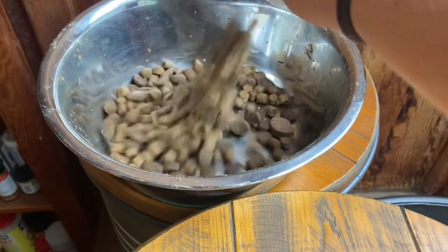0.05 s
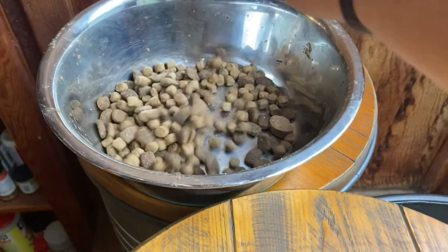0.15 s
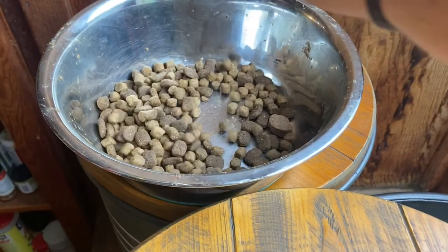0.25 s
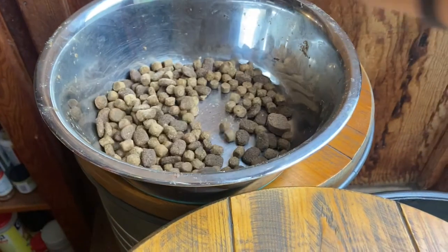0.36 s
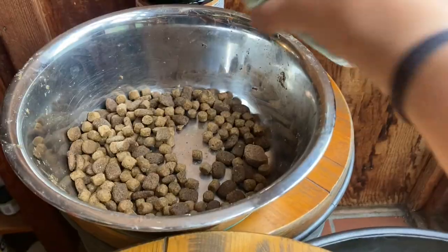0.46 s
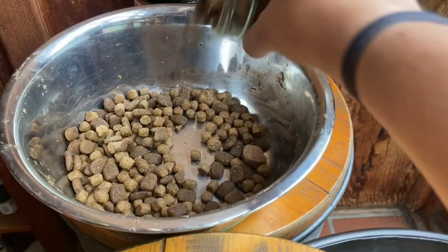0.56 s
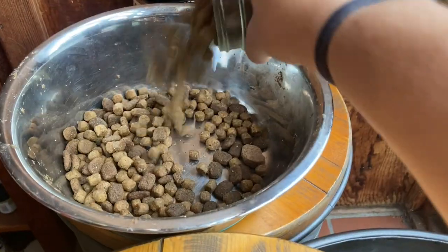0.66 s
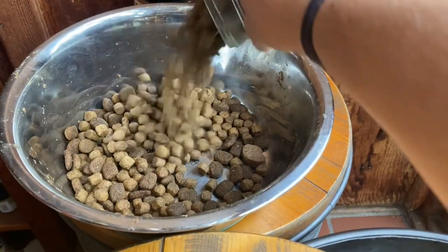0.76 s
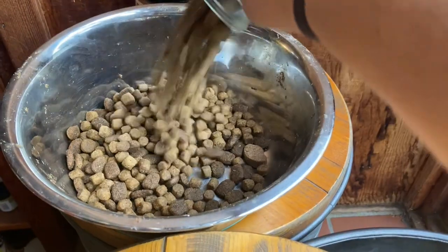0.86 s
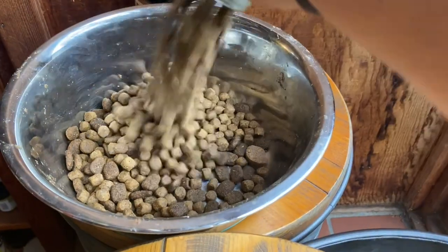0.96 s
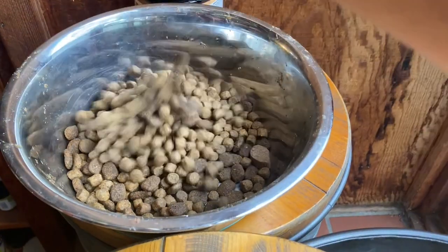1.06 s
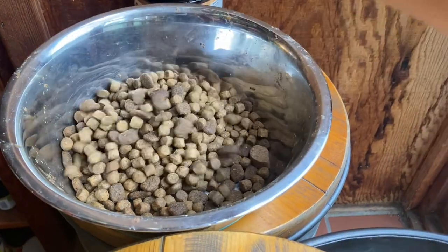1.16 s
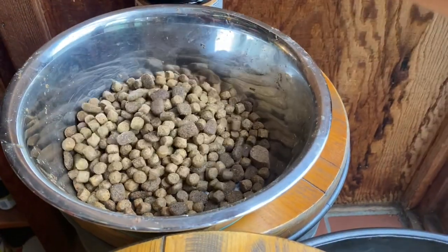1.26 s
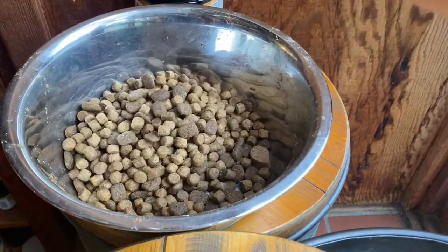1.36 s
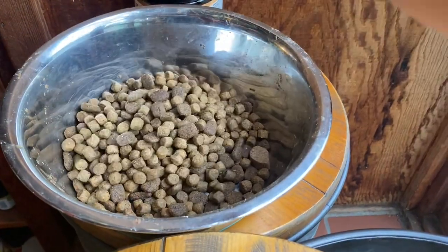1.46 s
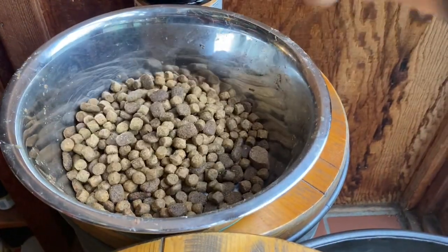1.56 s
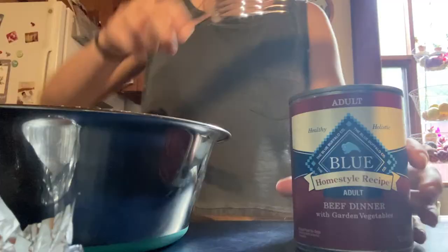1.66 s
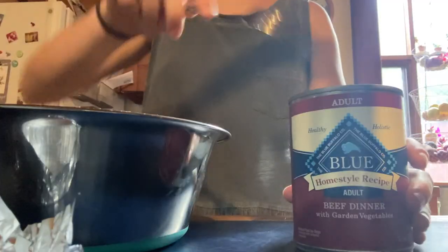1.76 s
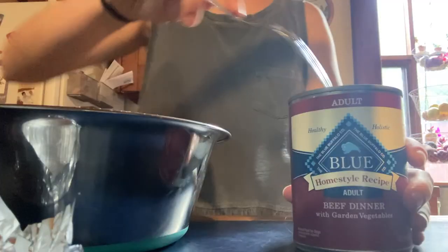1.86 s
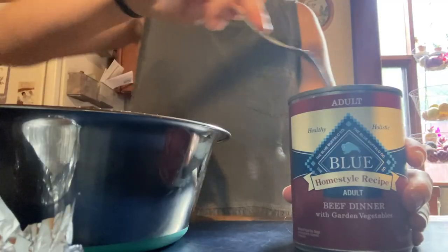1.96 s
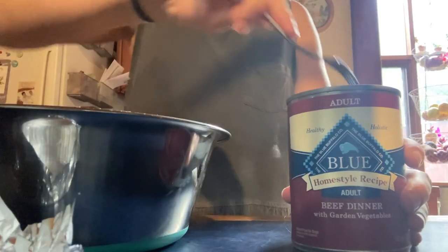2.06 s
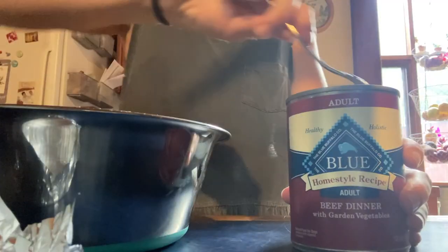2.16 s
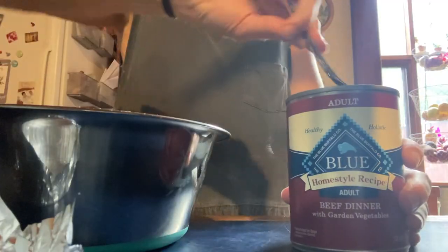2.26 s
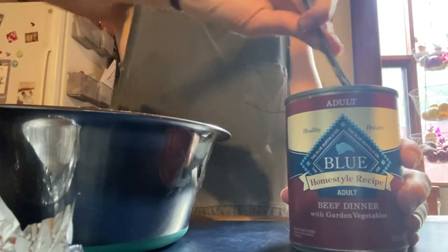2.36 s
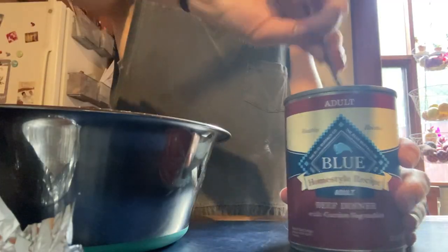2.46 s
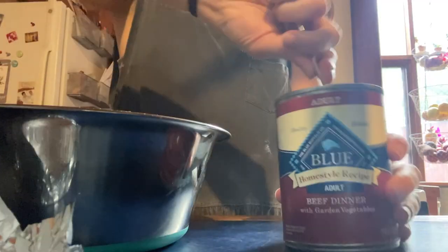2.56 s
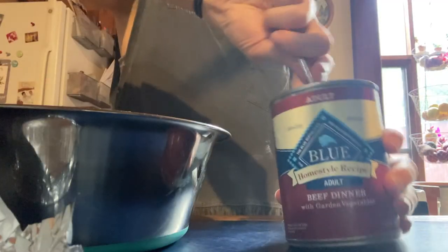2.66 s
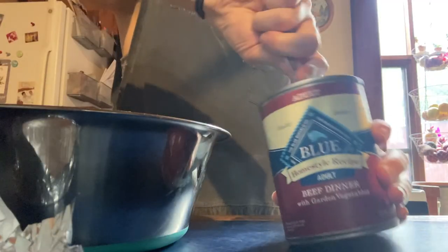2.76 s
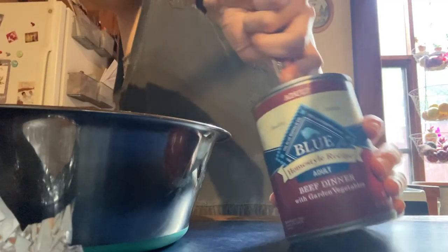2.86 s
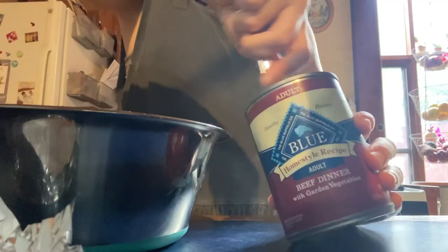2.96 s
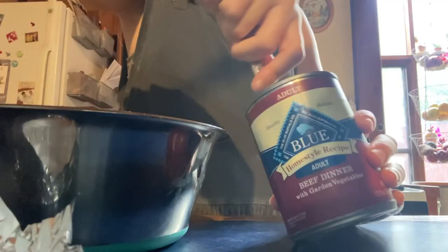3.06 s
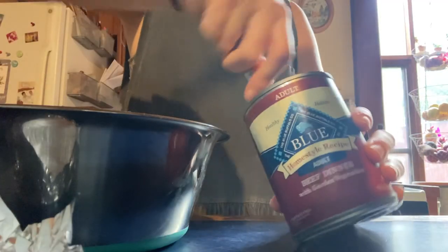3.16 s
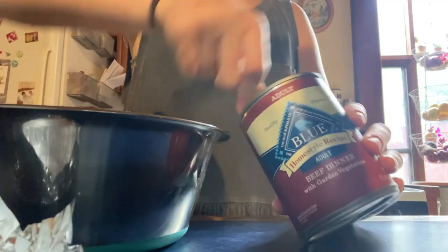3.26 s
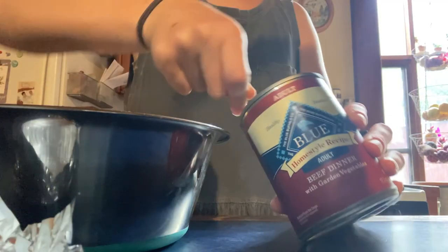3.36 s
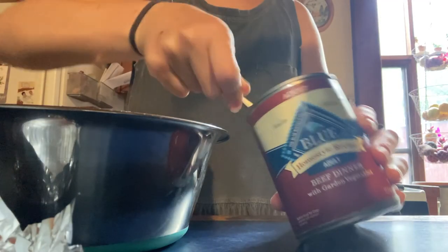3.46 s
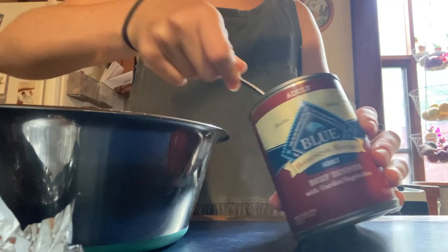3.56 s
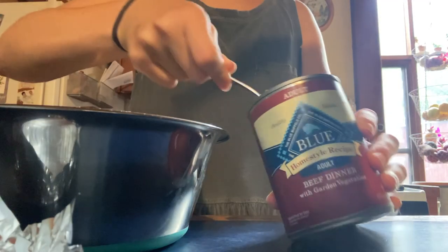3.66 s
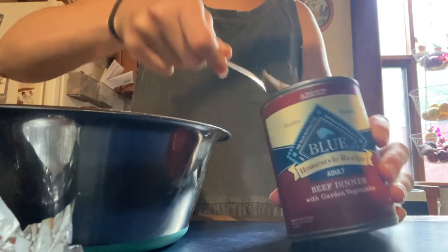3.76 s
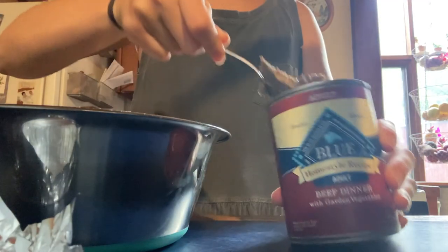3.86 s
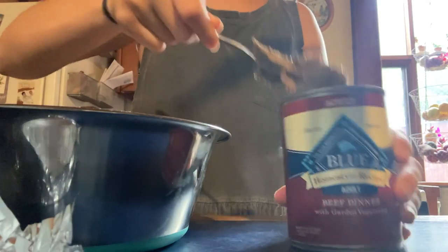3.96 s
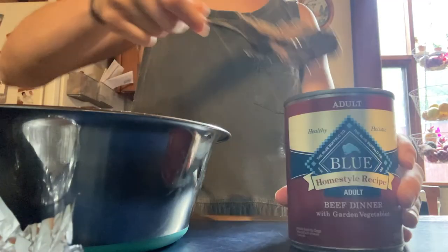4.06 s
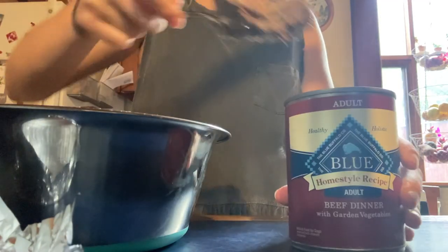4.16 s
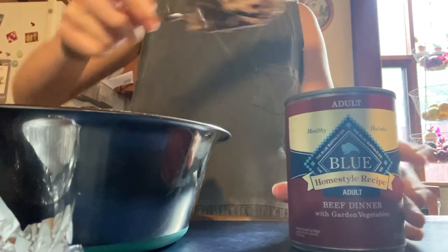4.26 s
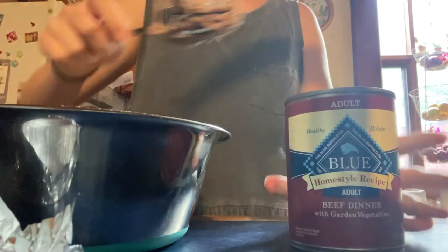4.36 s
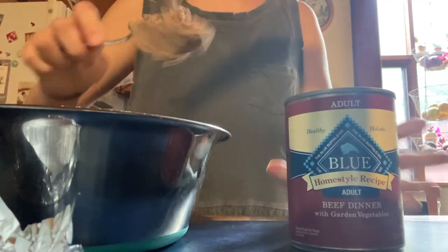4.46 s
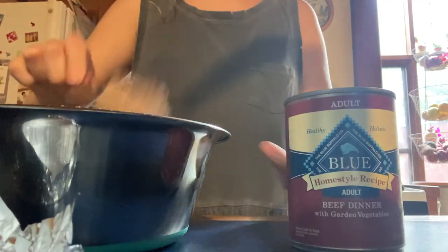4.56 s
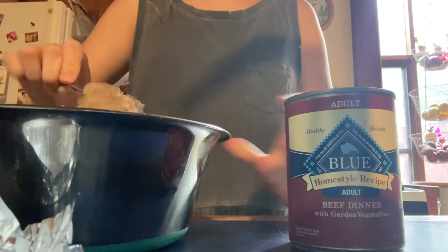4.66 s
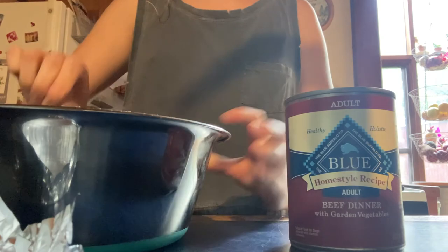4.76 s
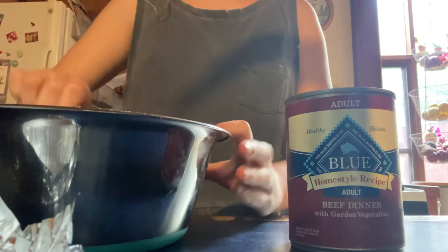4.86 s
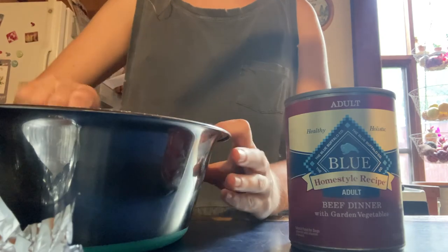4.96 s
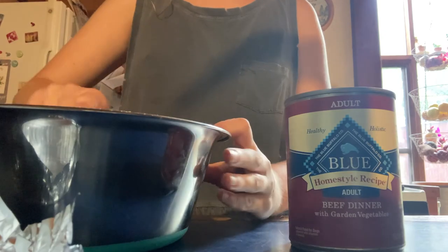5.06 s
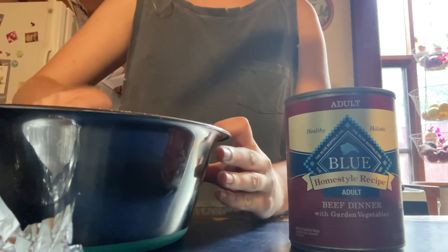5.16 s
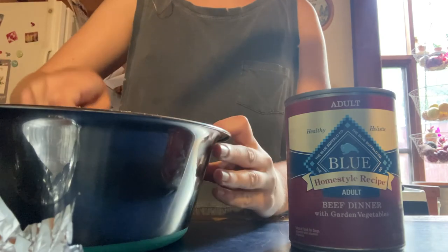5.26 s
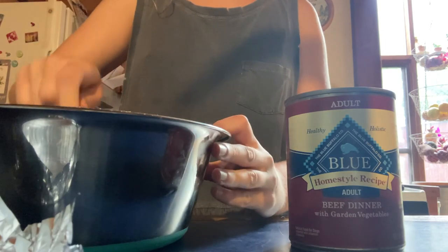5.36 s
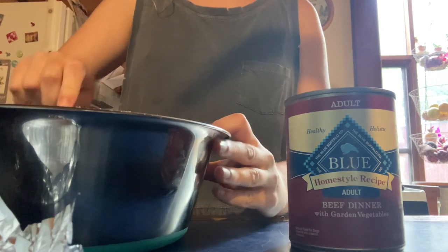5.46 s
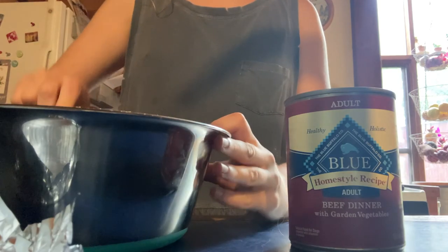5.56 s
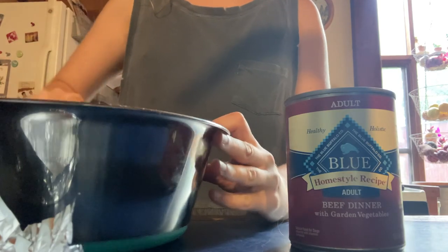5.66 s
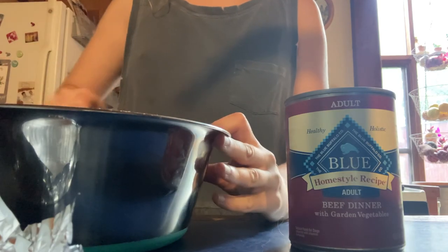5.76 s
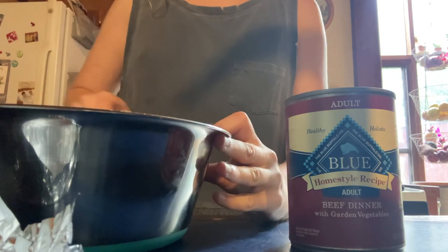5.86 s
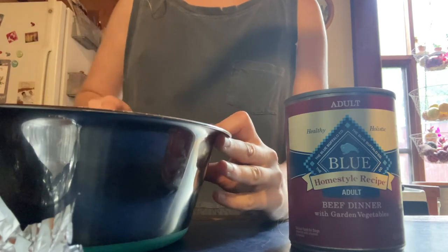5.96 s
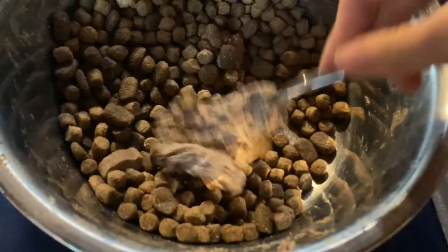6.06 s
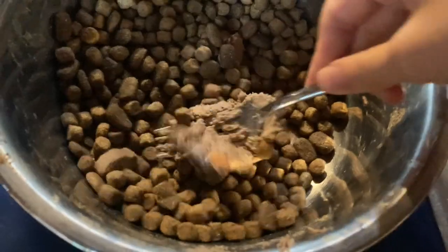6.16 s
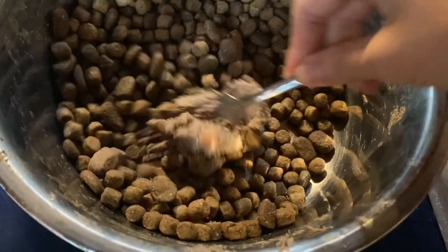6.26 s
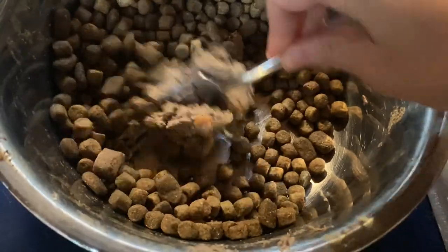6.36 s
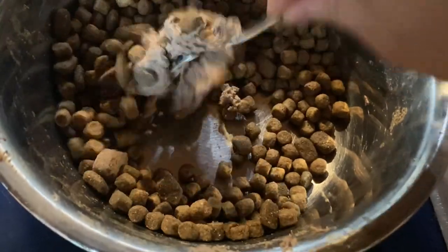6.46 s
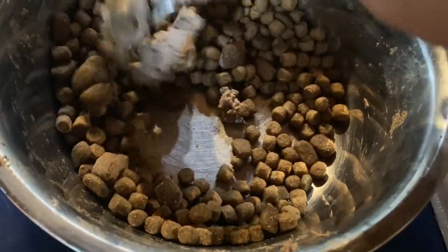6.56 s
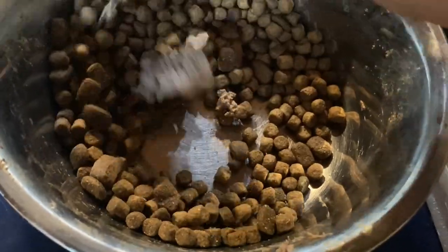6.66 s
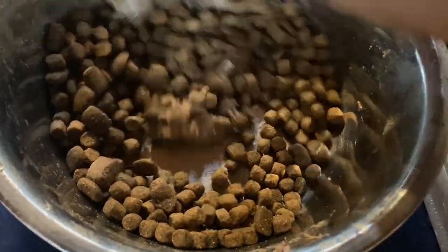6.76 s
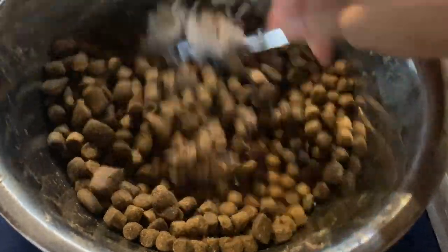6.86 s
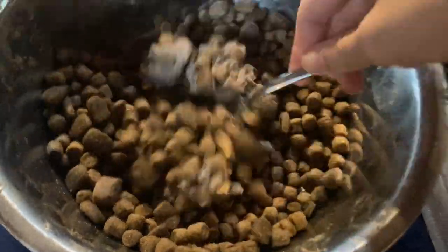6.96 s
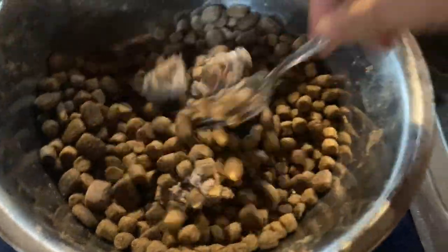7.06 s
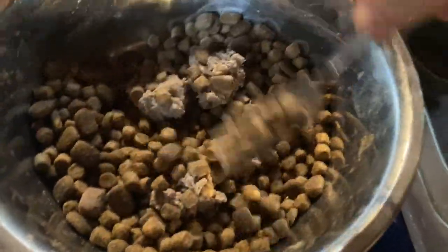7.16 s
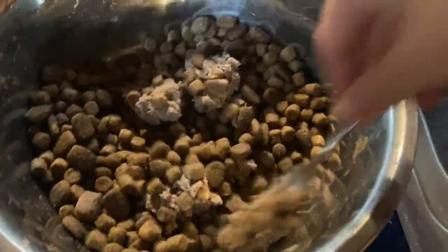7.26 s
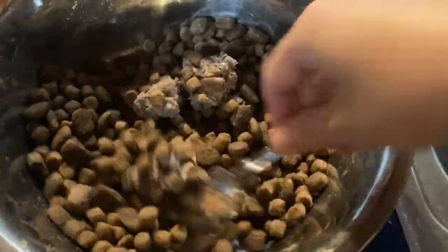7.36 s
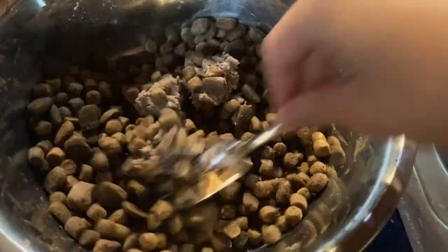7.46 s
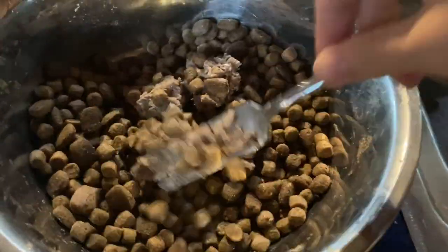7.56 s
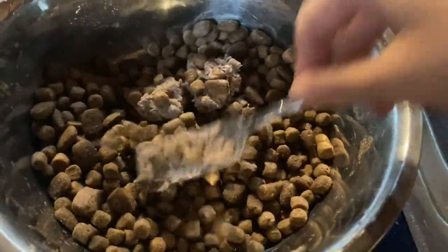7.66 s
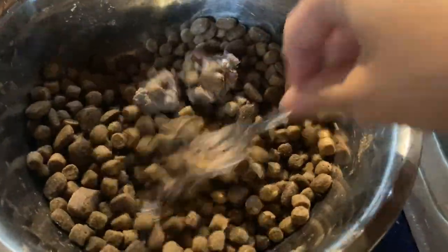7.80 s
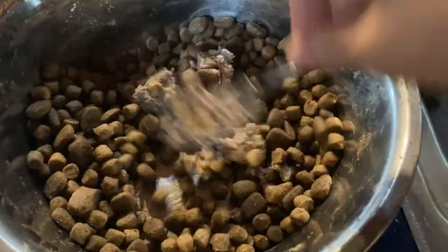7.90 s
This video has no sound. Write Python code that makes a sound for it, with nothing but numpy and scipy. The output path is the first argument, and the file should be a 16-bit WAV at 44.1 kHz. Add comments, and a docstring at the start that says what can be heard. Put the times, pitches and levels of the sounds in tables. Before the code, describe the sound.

In a quiet pantry with faint low hum, the tail of a scoop of dry kibble hails into a steel bowl at 0 s, leaving a metallic ring that is cut down around 0.4. A fuller scoop crashes in from about 0.55, rattling densely, then dribbling out with light scoop rings and a wall ping near 1.1; the ring fades. At 1.67 the place switches to a kitchen counter with a deeper hum. A spoon ticks and knocks a hollow can at 2.15, scrapes softly with small squeaks, thuds around 3.4, and gives a strong knock at 3.94, followed by wet smacks at 4.1-4.25. From 4.75 it digs crunchily into the kibble, with steel clinks at 5.48, 5.56 and 5.77. From 6.0, very close, irregular stirring strokes crunch, snap and clack, loudest around 6.6-6.8 and 7.2-7.3, with low bowl bumps and a clink at 6.83, continuing to the end near 8.

```python
"""A pantry, then a kitchen counter: two scoops of dry kibble rattle into a steel dog bowl, which rings on.
At the counter a spoon knocks, squeaks and ticks in a can of wet food, digs into the kibble and clinks on the bowl.
Last, just above the bowl, it stirs the crunching pellets. A low hum lies under each of the three places.
Pellets and sticky food are coloured noise grains and little pitched knocks; can, bowl and counter are resonators."""
import sys
import numpy as np
from scipy import signal
from scipy.fft import rfft, irfft, next_fast_len
from scipy.io import wavfile
from scipy.ndimage import map_coordinates

SR = 44100
rng = np.random.default_rng(int(sys.argv[2]) if len(sys.argv) > 2 else 0)


def dump_mix(stems):
    """Bounce the given channels to the path in sys.argv[1] as a 16-bit WAV at rate SR."""
    frames = np.atleast_2d(stems).T  # one column per channel
    limited = np.clip(frames, -1, 1)  # hard clip at full scale
    pcm = np.round(limited * 32767).astype(np.int16)
    wavfile.write(sys.argv[1], SR, pcm)


N = 349713
TIME = np.arange(N) / SR

# Levels in the tables set the balance within a layer; each layer has its own trim where it is mixed.
# --
# air of the two rooms: f/Hz, density/dB per Hz
PANTRY_AIR = [(18, -53.5), (30, -19.5), (253, -7), (623, -18), (761, -24.5), (2870, -41.5), (8240, -44.5),
              (12000, -52), (22000, -120)]
KITCHEN_AIR = [(25, -56), (49, 0), (86, -2), (293, 2.5), (373, -6), (462, 2), (655, -14.5), (952, -9.5),
               (1580, -27.5), (2780, -36.5), (5200, -49.5), (7500, -42), (15000, -43.5)]
# steady hum of appliances: f/Hz, level/dB
PANTRY_HUM = [(247.6, -54), (403.7, -66)]
KITCHEN_HUM = [(59.2, -51.5), (290.7, -53.5), (468.3, -58.5)]
# left-right likeness: f/Hz, likeness (0 to 1)
LIKENESS = [(100, 0.94), (400, 0.54), (1000, 0.48), (2200, 0.21), (3500, 0.046), (5500, 0.34), (7000, 0.57),
            (8000, 0.93), (15000, 1)]
# decay of the reflections off the walls: f/Hz, t60/s
WALL_DECAY = [(150, 0.52), (1000, 0.4), (5000, 0.36), (14000, 0.028)]
# in the treble one microphone leads the other: from f/Hz, lead of the left/s
LEAD_ABOVE_BOWL = (4700, 0.000294)
LEAD_AT_COUNTER = (4250, -0.000258)
HUM_START, KITCHEN_START, CLOSE_START = 0.4, 1.665, 6.005  # t/s: fuller hum, the counter, just above the bowl
TOP_HZ, HEADROOM = 16100, 0.96  # band limit; the loudest peaks are rounded off here

# can or bowl rocks and thuds on the counter: t/s, level/dB, centre f/Hz
THUDS = [(3.422, -23, 191), (3.525, -27.5, 127), (3.454, -20, 83.4), (3.938, -28.5, 158),
         (5.566, -13.5, 129), (5.772, -28.5, 134), (6.745, -18, 178), (7.211, -29, 132), (7.247, -22, 80.7)]
# the spoon bumps the loaded bowl: t/s, level/dB, centre f/Hz
BUMPS = [(4.759, -20.5, 348.5), (4.965, -23.5, 942), (5.046, -21.5, 764), (5.698, -26.5, 945),
         (5.866, -36, 940), (6.09, -19.5, 505), (6.192, -15, 492), (6.528, -22, 470), (6.733, -9.5, 291),
         (7.637, -19.5, 490), (7.751, -20.5, 456)]
PASSED_DB, COUNTER_HZ = -10.5, 137.5  # share of each bump that reaches the counter, and where it booms
# broad resonances: f/Hz, width/Hz, level/dB
COUNTER_BODY = [(89.1, 8.3, -0.5), (142.4, 8.9, 0.5), (212.9, 34, -5.5)]
LOADED_BOWL_BODY = [(294.7, 28, 1.1), (510.5, 43, 6.7), (802.5, 16, 4.4)]
HELD_BOWL_BODY = [(361, 46, -2.5), (739, 77, -2), (922, 87, -2)]
CAN_BODY = [(218.4, 69, 0), (479, 48.4, 2), (760, 80, -5), (951, 78, -4.5), (1307, 100, -15.5),
            (1915, 190, -18), (2955, 78, -20)]

# squeaks and scrapes, a faint rustle, brief rings of a knock and a clink: t/s, length/s, f/Hz, level/dB
NARROW_SOUNDS = [(0.462, 0.15, 2736, -60.5), (2.172, .028, 918, -36), (2.264, 0.04, 4550, -52),
                 (2.265, .035, 2270, -54.5), (2.916, 0.053, 2280, -40), (2.967, .045, 1810, -43.5),
                 (2.999, 0.033, 2750, -45), (3.424, 0.037, 2140, -48.5), (5.199, 0.043, 3400, -40.5),
                 (5.344, 0.058, 3130, -45.5), (5.478, 0.0085, 4500, -30.5), (5.479, 0.033, 3420, -39.5),
                  (7.224, 0.055, 8280, -21), (7.245, 0.074, 5230, -33)]
# the last pellets are shaken out and ring the metal scoop: t/s, level/dB
SHAKES = [(0.978, -28.5), (1.016, -33), (1.073, -34), (1.104, -31)]
# resonances of the scoop: f/Hz, level/dB
SCOOP_MODES = [(4530, 1), (3270, -12.5)]
SHAKE_S = 0.041

# steel on steel: t/s, crack/dB, ring/dB, ring centre f/Hz, loss/dB per octave from it, share of free ring time
CLINKS = [(5.4789, -32, -12, 4200, 23.5, 1.1), (5.5645, -9, -4, 2740, 4, 1.4),
          (5.7706, -11, -6.5, 4480, 5, .55), (6.829, -14.5, -7.5, 12700, 24, 0.43)]
# spoon and bowl ringing in contact: f/Hz, level/dB, t60/s
CONTACT_MODES = [(1280, -14, 0.17), (1943, -8, 0.2), (2231, -10, 0.19), (2305, -8, 0.19), (2830, -8, .05),
                 (3133, 3, 0.045), (3300, -3, 0.05), (3666, -15, 0.09), (4610, -6, .05), (4760, -9, 0.06),
                 (5150, -12, 0.06), (5870, -10, .08), (7300, -13, .07), (8600, -13, 0.09),
                 (11440, -15, 0.07), (12240, -15, .06), (13140, -6, .08)]
# noise of the crack: f/Hz, density/dB per Hz
CRACK_COLOUR = [(200, -4.5), (800, 4.5), (3000, -7.5), (6000, -4), (9000, -0.5), (12500, 2), (16000, -14.5)]
SKID_S = 0.00076  # a glancing blow takes this long to set the steel ringing

# small sharp ticks of the spoon at the can: t/s, level/dB
TICKS = [(1.679, -27), (2.122, -26.5), (2.211, -33), (2.6333, -34), (3.2293, -38), (3.3058, -40),
         (3.268, -33), (2.492, -43), (3.4158, -19), (3.426, -20), (3.449, -31), (3.4608, -24),
         (3.5891, -38.5), (3.6115, -25)]
# hollow knocks on the can: t/s, level/dB, centre f/Hz
KNOCKS = [(2.15, -11, 697), (2.416, -33.5, 940), (2.633, -31.5, 457), (3.135, -28.5, 445),
          (3.271, -29.5, 1013), (3.377, -29.5, 232), (3.421, -26, 265), (3.523, -26.5, 900),
          (3.61, -28.5, 203), (3.9365, -5.5, 563)]
# wet food smacks as it parts from the can: t/s, level/dB
SMACKS = [(4.07, -20), (4.1947, -24.5), (4.207, -21), (4.2293, -19.5), (4.2403, -23.5)]
# strokes in the can: t/s, push/s, wet crackle/dB, hollow/dB
SCRAPES = [(1.689, 0.091, -64.5, -43), (2.152, 0.022, -43.5, -35), (2.261, 0.033, -51.5, -45.5),
           (2.319, 0.039, -63, -41.5), (2.397, 0.0366, -55, -41.5), (2.917, 0.11, -44, -49),
           (3.094, 0.058, -54, -41.5), (3.409, .05, -40.5, -33.5), (3.507, 0.026, -61, -37)]
# noise of ticks and smacks: f/Hz, density/dB per Hz
TICK_COLOUR = [(710, -35.5), (1200, -12), (2150, -3.5), (5350, -8), (7250, -11.5), (12100, -8),
               (16000, -20)]
SMACK_COLOUR = [(500, -4), (2200, -3.5), (6000, -6.5), (8500, -1), (12000, -2.5), (16000, -3)]
SCRAPE_FALL_S = 0.14  # t60 of sticky food
ONSET_S = 0.0022  # every stroke starts this fast, holds or changes level while it pushes, then dies away

# a scoop tips out in a gush, then dribbles until it is empty: t/s, gush/s, whole pour/s, level/dB
SCOOPS = [(0.0, 0.08, 0.08, -20), (0.589, 0.14, 0.47, -20.5)]
# clumps of pellets landing together: t/s, level/dB
CLUMPS = [(0.0314, -11), (0.059, -23), (0.1396, -19), (0.25, -45.5), (0.375, -52), (0.558, -5),
          (0.6022, -3.5), (0.6183, -3.5), (0.634, -7.5), (0.676, -8), (0.699, -2), (0.728, -10),
          (0.9358, -13.5), (1.503, -53.5)]
# the last pellets of each scoop strike the bare wall: t/s, level/dB
WALL_HITS = [(0.1385, -34), (1.112, -21)]
# modes of the bowl: f/Hz, level/dB, t60/s
BOWL_MODES = [(1039, -10, 0.42), (1561, -14, 0.6), (1739, -15, 0.65), (1895, -13, 0.55), (2083, -16, 0.58),
              (2272, -16, 0.58), (2870, -19, 0.4), (3128, -6, 0.26), (3370, -2, 0.2), (3549, -20, 0.6),
              (4301, -15, 0.8), (4662, -10, 0.3), (4714, -13, 1.0), (5120, -17, 0.33), (5530, -26, 0.9),
              (5782, -16, 0.27), (5965, -5, 0.26), (6202, -11, 0.19), (7047, -12, 0.27), (7569, -16, 0.27),
              (8075, -16, 0.22), (8549, -15, 0.24)]
# the almost empty bowl sings on one mode: f/Hz, level/dB, t60/s
EMPTY_RING = (1890, -38, 0.73)
# noise of the first scoop, of the second, and of the bowl's floor: f/Hz, density/dB per Hz
POUR_COLOUR = [(35, -55.5), (60, -24.5), (108, -10.5), (172, -26.5), (636, -12.5), (803, -6), (1470, -10),
               (2650, -1.5), (6430, -7.5), (8120, 1), (9790, -5.5), (16000, -30)]
RATTLE_COLOUR = [(1760, -26.5), (3000, -12.5), (4540, -4), (6760, 1), (8000, 0.5), (9870, -7),
                 (11400, -8.5), (14800, -17.5), (16000, -36.5)]
BOWL_FLOOR_COLOUR = [(35, -53.5), (107, -9.5), (220, -24), (643, -12.5), (808, -5.5), (1600, -10.5),
                     (4000, -3.5), (5200, -26.5), (8800, -120)]
# the first scoop's ring is cut down abruptly before the second: from t/s, to t/s
RING_CUT = (0.4, 0.55)
RING_CUT_DB = -12
DRIBBLE_DB, GUSH_FALL_S, SETTLE_S = -9, 0.052, 0.44  # dribble under the gush; t60 of gush and last bounces
HEAP_DB = -17  # how far the full heap muffles the bowl's floor
PING_DB, PING_S = -10, 0.029  # single pellets ping on the steel: level under the gush, t60
RUNNING_RING_DB, SHIMMER_DB = -5, -18

# pushes into the heap: t/s, push/s, settling t60/s, crunch/dB, hollow/dB
DIGS = [(4.758, 0.21, 0.71, -31.5, -30.5), (5.24, .22, 0.46, -43.5, -42), (5.62, 0.14, 0.57, -46, -49)]
# stirring strokes: t/s, push/s, settling t60/s, crunch/dB, clack/dB
STIRS = [(6.02, 0.01, 0.27, -40.5, -34), (6.075, 0.022, 0.2, -29, -29), (6.185, 0.02, 0.46, -38, -30.5),
         (6.25, .14, 0.28, -34.5, -32.5), (6.44, 0.12, 0.1, -46.5, -40.5), (6.615, 0.081, 0.33, -19.5, -34),
         (6.722, 0.039, 1, -24, -25), (6.98, 0.071, 0.077, -53, -37.5), (7.195, 0.045, 0.42, -14.5, -28),
         (7.39, 0.022, 0.43, -35.5, -34.5), (7.615, 0.041, 0.17, -23.5, -23),
         (7.749, 0.015, 0.5, -24, -24.5), (7.88, 0.016, 0.088, -40, -35)]
# the loudest pellets snapping past the spoon: t/s, level/dB, clack relative to it/dB
SNAPS = [(4.841, -17, -3.5), (4.9101, -15.5, -9), (4.9408, -16, -6), (4.967, -19.5, 3.5),
         (5.0458, -15.5, -7), (5.1152, -25, -4), (5.2101, -28.5, -2), (5.269, -28, 5.5), (5.3061, -15, -13),
         (5.3582, -22.5, 6.5), (5.4171, -26, -1.5), (5.518, -17, -3.5), (5.653, -32.5, 5.5),
         (6.0266, -25, 4), (6.0915, -15.5, 0.5), (6.1137, -13.5, -8), (6.1925, -15.5, 2),
         (6.2478, -20.5, -16), (6.268, -24.5, -1.5), (6.287, -17, -1), (6.348, -13.5, -8.5),
         (6.383, -17, -5.5), (6.489, -35, 8.5), (6.5264, -11, 2.5), (6.541, -21.5, -32), (6.5987, -15, -29),
         (6.6264, -8.5, -30), (6.6464, -10.5, -28), (6.665, -15, -18.5), (6.7318, -5.5, -11),
         (6.735, -5, -16), (6.8265, -7, -9.5), (6.933, -22.5, 5), (7.0025, -18, -2.5), (7.0413, -28.5, 5.5),
         (7.0799, -21, -0.5), (7.1471, -19, -8), (7.1627, -16.5, -19), (7.203, -17.5, -18.5),
         (7.253, -12, -11.5), (7.295, -11.5, -26.5), (7.332, -9, -22), (7.3405, -18, -22),
         (7.4153, -24, -1), (7.4539, -19.5, -19.5), (7.4927, -34, 11), (7.5205, -35.5, 12.5),
         (7.6263, -16.5, 3), (7.638, -11.5, -2), (7.663, -12, -5.5), (7.7505, -7.5, -8.5),
         (7.7596, -12, -8.5), (7.8078, -8.5, -4.5), (7.8441, -14, -19), (7.8545, -12, -18),
         (7.8897, -23, 0)]
# noise of digging, of stirring, and of dull hard contacts: f/Hz, density/dB per Hz
DRY_CRUNCH_COLOUR = [(650, -50), (1100, -3), (1660, 5.5), (3450, 5), (4830, 2.5), (6500, -3), (8260, -6.5),
                     (10000, -14), (12000, -10), (16000, -21.5)]
CRUNCH_COLOUR = [(1290, -16), (2200, -6), (3900, -4.5), (5000, -0.5), (6000, -4), (7900, 1), (9170, -3),
                 (10500, -7.5), (13000, -14.5), (15500, -22.5), (16000, -27.5)]
CLACK_COLOUR = [(300, -63), (750, -9.5), (1350, 6.5), (2200, -6), (3500, 1.5), (7000, -33.5),
                (16000, -50.5)]
SURGES_PER_S = 45  # the heap jams and yields in uneven surges
SLIPS_PER_S, SLIP_DB, SLIP_CLACK_DB = 25, 2.5, -5  # lesser snaps: rate, level over the crunch, their clack
PELLET_RING_DB, PELLET_RING_S = -5, 0.02  # ring of a snapped pellet under its snap, t60
CLACK_RING_DB, CLACK_RING_S = -2.5, 0.0098  # the same for its dull clack


def amp(db):
    """Decibels to gain."""
    return 10 ** (np.asarray(db) / 20)


def unit(x):
    """x at rms 1."""
    return x / np.sqrt(np.mean(x ** 2) + 1e-20)


def along(points, hz):
    """Values at hz, read off (Hz, value) points on a log axis."""
    f, v = np.transpose(points)
    return np.interp(np.log(hz + 1), np.log(f + 1), v)


def near(hz, centre_hz, slope_db):
    """The struck spot favours modes around centre_hz: dB lost per octave away, up to 1.5 octaves."""
    return -slope_db * min(abs(np.log2(hz / centre_hz)), 1.5)


def add(out, s, sound, db):
    """Mix a sound into out at time s, with its peak at db."""
    part = out[:, max(round(s * SR), 0):][:, :sound.shape[1]]
    part += amp(db) * sound[:, :part.shape[1]] / np.abs(sound).max()


def through(x, response):
    """x convolved with an impulse response of energy 1."""
    response = np.atleast_2d(response)
    energy = np.sum(response ** 2) / len(response)
    return signal.oaconvolve(x, response / np.sqrt(energy), axes=1)[:, :N]


def colour(points, size=4096):
    """Causal (minimum-phase) impulse response with the given spectrum."""
    cepstrum = irfft(np.log(amp(along(points, np.fft.rfftfreq(size, 1 / SR)))))
    cepstrum[1:size // 2] *= 2
    cepstrum[size // 2 + 1:] = 0
    return irfft(np.exp(rfft(cepstrum)))


def body(peaks, size=16384):
    """Impulse response of a few broad resonances, alternating in sign."""
    f = np.fft.rfftfreq(size, 1 / SR)
    response = 0
    for k, (hz, width, db) in enumerate(peaks):
        damping = 1j * f * width
        response = response + (-1) ** k * amp(db) * damping / (hz * hz - f * f + damping)
    return irfft(response)


def ring(modes, scatter_db=2, size=SR // 2):
    """Decaying modes, each with its own strength and phase in the two channels."""
    t = np.arange(size) / SR
    out = np.zeros((2, size))
    for hz, db, t60 in modes:
        strength = amp(db + scatter_db * rng.standard_normal((2, 1)))
        out += strength * amp(-60 * t / t60) * np.sin(2 * np.pi * (hz * t + rng.random((2, 1))))
    return out


def blows(s, db):
    """One impulse for each contact."""
    return np.bincount(np.round(np.asarray(s) * SR).astype(int).clip(0, N - 1), amp(db), N)


def bursts(force, t60):
    """Each impulse becomes a short decaying burst of noise; overlapping bursts add in power."""
    power = signal.lfilter([1], [1, -np.exp(-2 * np.log(1000) / (t60 * SR))], force ** 2)
    return np.sqrt(np.abs(power)) * rng.standard_normal((2, N))


def grains(rate, spread_db, t60):
    """Random little contacts of uneven size, rate a second, at rms 1."""
    size = amp(spread_db * np.clip(rng.standard_normal(N), -2, 2))
    return unit(bursts(size * (rng.random(N) < rate / SR), t60))


def clatter(centre_hz, octaves, spread_db, t60, count, size=768):
    """count little knocks at chance moments, each at a pitch of its own, at rms 1."""
    t = np.arange(size) / SR
    where = (rng.integers(0, N, (count, 1)) + np.arange(size)).ravel()
    pitch, level = np.clip(rng.standard_normal((2, count, 1)), -2, 2)
    fade = amp(spread_db * level - 60 * t / t60) * (1 - np.exp(-t * centre_hz))
    hz = centre_hz * 2 ** (octaves * pitch)
    waves = fade * np.sin(2 * np.pi * (hz * t + rng.random((2, count, 1))))
    return unit(np.array([np.bincount(where, w.ravel(), N)[:N] for w in waves]))


def stroke(s, hold, t60, build_db=0):
    """Gain of one movement: a quick start, a level that holds or moves by build_db, then a steady fall."""
    t = TIME - s
    course_db = np.interp(t, [0, hold, hold + 2 * t60], [-build_db, 0, -120])
    return np.clip(t / ONSET_S, 0, 1) * amp(course_db)


def effort(rows, build_db):
    """Gains of the bright and the dull layer over a series of strokes."""
    gains = np.zeros((2, N))
    for s, push, t60, bright_db, dull_db in rows:
        gains += amp([[bright_db], [dull_db]]) * stroke(s, push, t60, build_db)
    return gains


def surge(depth_db):
    """A gain that swells and sags at random as the pellets jam and yield."""
    knots = rng.standard_normal(int(N * SURGES_PER_S / SR) + 4)
    return amp(depth_db * np.clip(map_coordinates(knots, [TIME * SURGES_PER_S]), -2, 2))


def struck(rows, peaks, slope_db, rough, t60):
    """Blows on a resonant body: a clean push with a short, bright chatter."""
    out, t = np.zeros((2, N)), np.arange(SR // 10) / SR
    for s, db, centre_hz in rows:
        modes = [(hz, width, level + near(hz, centre_hz, slope_db)) for hz, width, level in peaks]
        push = rough * amp(-60 * t / t60) * np.diff(rng.standard_normal((2, len(t) + 1)))
        push[:, 0] += 1
        mid, side = signal.fftconvolve(push, body(modes)[None], axes=1)
        # a quarter turn of phase puts the second channel out of step
        side = signal.hilbert(side, 2 * len(side)).imag[:len(side)]
        add(out, s, np.array([mid, side]), db)
    return out


def background(spectrum, level_db, lines, hum_db):
    """Moving air as coloured noise, and an appliance's hum as sines of slowly drifting phase."""
    def drift():
        return map_coordinates(rng.standard_normal(N // 4096 + 2), [np.arange(N) / 4096], order=1)

    air = amp(level_db) * through(rng.standard_normal((2, N)), colour(spectrum))
    for hz, db in lines:
        air[0] += amp(hum_db + db) * np.sin(2 * np.pi * hz * TIME + 0.11 * drift())
    return air


def room(x):
    """The walls answer a few milliseconds later, each frequency dying at its own speed."""
    hz, t, z = signal.stft(rng.standard_normal((2, SR // 2)), SR, nperseg=256)
    decay = amp(-60 * t / along(WALL_DECAY, hz)[:, None])
    tail = signal.istft(z * decay, SR, nperseg=256)[1]
    return through(x, np.pad(tail, ((0, 0), (SR // 250, 0))))


def thumps():
    """Heavier pushes reach the bowl's floor and the counter under it."""
    bumps = struck(BUMPS, LOADED_BOWL_BODY, slope_db=15.5, rough=0.44, t60=0.0089)
    passed = [(s, db + PASSED_DB, COUNTER_HZ) for s, db, _ in BUMPS]
    counter = struck(THUDS + passed, COUNTER_BODY, slope_db=6.0, rough=0.061, t60=0.02)
    return amp(-1.0) * bumps + amp(-2) * counter


def narrow_sounds():
    """Short narrow-band squeaks, scrapes, rustle and rings: grains of noise through a sharp resonance."""
    out = np.zeros((2, N))
    rasp = grains(rate=1300, spread_db=0.5, t60=0.011)
    shaken = [(s, SHAKE_S, hz, db + mode_db) for s, db in SHAKES for hz, mode_db in SCOOP_MODES]
    for s, length, hz, db in NARROW_SOUNDS + shaken:
        swell = np.sqrt(signal.windows.hann(round(length * SR)))
        grit = rasp[:, round(s * SR):][:, :len(swell)]
        band = signal.lfilter(*signal.iirpeak(hz, 16, SR), grit)
        band += amp(-26) * signal.lfilter(*signal.iirpeak(hz, 1.5, SR), grit)  # broad noise around it
        band += amp(-36) * signal.lfilter(*signal.iirpeak(2 * hz, 9, SR), grit)  # a rough overtone
        out[:, round(s * SR):][:, :len(swell)] += amp(db + 3) * swell * unit(band)  # +3 dB offsets the swell
    return out


def clinks():
    """The spoon hits the bowl: a short crack, then hand-damped modes, each with quickly dying neighbours."""
    out = np.zeros((2, N))
    for s, _, ring_db, centre_hz, slope_db, free in CLINKS:
        modes = [(hz, db + near(hz, centre_hz, slope_db), free * t60) for hz, db, t60 in CONTACT_MODES]
        cluster = [(hz * (1 + 0.06 * rng.standard_normal()), db - 3.5, 0.14 * t60)
                   for hz, db, t60 in modes for _ in range(4)]
        clang = ring(modes + cluster, scatter_db=6.5)
        onset = 1 - np.exp(-TIME[:clang.shape[1]] / SKID_S)
        add(out, s, clang * onset, ring_db)
    s, crack_db = np.transpose(CLINKS)[:2]
    force = blows(s, crack_db)
    crack = bursts(force, t60=0.049)
    lead_in = bursts(force[::-1], t60=0.078)[:, ::-1]  # a faint swell of noise leads into each crack
    return out + through(amp(-6.5) * crack + amp(-27) * lead_in, colour(CRACK_COLOUR))


def can():
    """The spoon works in sticky food, ticks on the rim, knocks the hollow can and lifts a lump out."""
    scrapes = [(s, push, SCRAPE_FALL_S, wet_db, hollow_db) for s, push, wet_db, hollow_db in SCRAPES]
    wet, hollow = effort(scrapes, build_db=-1.5)  # these strokes start strongest
    crackle = amp(-5.5) * wet * grains(rate=910, spread_db=2, t60=0.007)
    # tiny pockets of air part in the food
    pops = clatter(centre_hz=2760, octaves=0.83, spread_db=0, t60=0.0088, count=5000, size=384)
    squelch = amp(-12.5) * wet * pops
    ticks = amp(-7.5) * bursts(blows(*np.transpose(TICKS)), t60=0.014)
    smacks = amp(-4.5) * through(bursts(blows(*np.transpose(SMACKS)), t60=0.019), colour(SMACK_COLOUR))
    sticking = hollow * grains(rate=600, spread_db=6.5, t60=0.036)
    scrape = amp(-3.0) * through(sticking, body(CAN_BODY))
    scrape += amp(-24.5) * through(sticking, colour(CLACK_COLOUR))
    knocks = amp(2.0) * struck(KNOCKS, CAN_BODY, slope_db=3.5, rough=0.21, t60=0.0042)
    s, db, _ = np.transpose(KNOCKS)
    hard_edge = bursts(blows(s, db), t60=0.014)
    knocks += amp(-21) * through(hard_edge, colour(CLACK_COLOUR))
    return through(crackle + ticks, colour(TICK_COLOUR)) + squelch + smacks + scrape + knocks


def pour():
    """Pellets hail into the bowl; the growing heap muffles its floor while the wall rings on."""
    first, second = [amp(db) * np.maximum(stroke(s, gush, GUSH_FALL_S),
                                          amp(DRIBBLE_DB) * stroke(s, whole, SETTLE_S))
                     for s, gush, whole, db in SCOOPS]
    s, _, whole, db = SCOOPS[1]
    heap = np.clip((TIME - s) / whole, 0, 1) ** 1.3
    floor = amp(db + HEAP_DB * heap) * stroke(s, whole, t60=0.65)

    clumps = amp(-8.0) * bursts(blows(*np.transpose(CLUMPS)), t60=0.073)
    gush = amp(-3.0) * first * grains(rate=2200, spread_db=-1.5, t60=0.003)
    hail = through(gush + clumps, colour(POUR_COLOUR))
    pellets = grains(rate=970, spread_db=-0.5, t60=0.00364)
    hail += amp(-2.5) * through(second * pellets, colour(RATTLE_COLOUR))
    hail += amp(-5.5) * through(floor * pellets[::-1], colour(BOWL_FLOOR_COLOUR))  # channels swapped
    pings = clatter(centre_hz=3188, octaves=.8, spread_db=3, t60=PING_S, count=2200, size=1024)
    hail += amp(PING_DB) * (first + second) * pings

    # pellets bounce off the full heap into the wall
    wall_db = RUNNING_RING_DB + np.interp(TIME, [.2, .9, 1.13], [-15, -11, -3])
    shimmer = [(hz, 0, .36) for hz in rng.uniform(1000, 9000, size=70)]  # the thin wall's many weak modes
    out = hail + through(hail * amp(wall_db), ring(BOWL_MODES))
    out += amp(SHIMMER_DB) * through(hail, ring(shimmer))
    for s, db in WALL_HITS:
        add(out, s, ring(BOWL_MODES, scatter_db=-1, size=SR), db)
    hz, db, t60 = EMPTY_RING
    add(out, CLUMPS[0][0], ring([(hz, 0, t60)]), db)
    ring_cut = amp(RING_CUT_DB * ((TIME > RING_CUT[0]) & (TIME < RING_CUT[1])))
    return out * ring_cut * (TIME < KITCHEN_START)


def in_bowl(x, count=14, size=8192):
    """Rubbing on the filled bowl takes on its damped modes, new at each spot the spoon passes."""
    out = amp(-2) * x
    for start in range(0, N, size // 2):
        pitches = np.exp(rng.uniform(np.log(1200), np.log(9000), size=count))
        wall = ring([(hz, 0, .04) for hz in pitches], size=size // 2)
        piece = x[:, start:start + size]
        faded = piece * signal.windows.hann(size)[:piece.shape[1]]
        answer = signal.fftconvolve(faded, wall / np.linalg.norm(wall[0]), axes=1)
        out[:, start:start + answer.shape[1]] += amp(-9.5) * answer[:, :N - start]
    return out


def snap(force, clack_force):
    """A bright snap with a duller clack, each after a faint, short swell of noise."""
    def release(push):
        lead_in = bursts(push[::-1], t60=0.047)[:, ::-1]  # a burst turned backwards
        return bursts(push, t60=0.022) + amp(-13) * lead_in

    bright = amp(-2.0) * through(release(force), colour(CRUNCH_COLOUR))
    return bright + amp(-4.0) * through(release(clack_force), colour(CLACK_COLOUR))


def slips(pressure):
    """Lesser snaps come at chance moments, as hard as the spoon presses."""
    force = amp(SLIP_DB) * pressure * (rng.random(N) < SLIPS_PER_S / SR)
    return snap(force, amp(SLIP_CLACK_DB) * force)


def dig():
    """The spoon presses into the heap; pellets grind against the hand-held bowl."""
    crunch, hollow = effort(DIGS, build_db=6.0)
    grinding = surge(depth_db=2.5) * grains(rate=700, spread_db=3.0, t60=0.005)
    out = amp(-0.5) * through(crunch * grinding, colour(DRY_CRUNCH_COLOUR))
    out += amp(5.5) * through(hollow * grinding, body(HELD_BOWL_BODY))
    return out + amp(6) * slips(crunch)


def snaps(count=10):
    """The hardest jams give way, and each pellet rings for an instant, bright and dull, at chance pitches."""
    s, db, clack_db = np.transpose(SNAPS)
    out = amp(-2.5) * snap(blows(s, db), blows(s, db + clack_db))
    for when, level_db, dull_db in SNAPS:
        pitches = np.minimum(rng.uniform(2498, 11500, size=count), TOP_HZ)
        bright = [(hz, 0, PELLET_RING_S) for hz in pitches]
        add(out, when, ring(bright, scatter_db=2.5, size=4096), level_db + PELLET_RING_DB)
        dull = [(hz, 0, CLACK_RING_S) for hz in rng.uniform(1000, 2460, size=count // 2)]
        add(out, when, ring(dull, size=2048), level_db + dull_db + CLACK_RING_DB)
    return out


def stir():
    """Pellets crunch along the steel and clack, each at its own pitch; clacks also drum on the bowl's floor."""
    crunch, clack = effort(STIRS, build_db=7.5) * surge(depth_db=2.0)
    clacks = clatter(centre_hz=1676, octaves=0.44, spread_db=1.5, t60=0.0032, count=1400)
    contacts = clack * grains(rate=150, spread_db=3.5, t60=0.004)
    drumming = amp(-7.0) * through(contacts, body(LOADED_BOWL_BODY))
    drumming += amp(-6.5) * through(contacts, colour(CLACK_COLOUR))
    crunching = crunch * grains(rate=970, spread_db=3.5, t60=0.0037)
    out = amp(-4.5) * through(crunching, colour(CRUNCH_COLOUR))
    return out + amp(-7.0) * clack * clacks + drumming + slips(crunch)


def microphones(pair, from_hz, lead_s):
    """Two signals become left and right: alike in the bass, loose in the middle, out of step in the treble."""
    m = next_fast_len(N + SR // 4)
    hz = np.fft.rfftfreq(m, 1 / SR)
    turn = np.arccos(np.clip(along(LIKENESS, hz), -1, 1)) / 2
    mid, side = rfft(pair, m) * [np.cos(turn), np.sin(turn)]
    twist = np.exp(1j * np.pi * lead_s * np.maximum(hz - from_hz, 0))
    return irfft(np.array([(mid + side) * twist, (mid - side) / twist]), m)[:, :N]


def scene():
    """Pouring, spooning and stirring over the hum of each place."""
    pantry = background(PANTRY_AIR, -59.0, PANTRY_HUM, hum_db=1.5)
    pantry *= np.where(TIME < HUM_START, amp(-8.5), 1)
    kitchen = background(KITCHEN_AIR, -49.0, KITCHEN_HUM, hum_db=-1.0)
    # the hollow of the bowl swells the hum
    kitchen += amp(-12.0) * (TIME > CLOSE_START) * through(kitchen, body(LOADED_BOWL_BODY))
    food = thumps() + narrow_sounds() + clinks() + can() + pour() + in_bowl(dig() + snaps() + stir())
    air = food + amp(-14.5) * room(food) + np.where(TIME < KITCHEN_START, pantry, kitchen)
    at_counter = (TIME > KITCHEN_START) & (TIME < CLOSE_START)
    both = np.where(at_counter, microphones(air, *LEAD_AT_COUNTER), microphones(air, *LEAD_ABOVE_BOWL))
    # the bowl stands to the left while it is held
    lean_db = np.interp(TIME, [4.6, 4.8, 5.6, 5.9, 6.0], [0, 1.3, 1.5, 0.5, -1.0])
    return both * amp(np.array([lean_db, -lean_db]) / 2)


def record(dry):
    """Peaks are rounded off, and nothing is kept above the band limit."""
    rounded = dry / (1 + (dry / HEADROOM) ** 4) ** .25
    m = next_fast_len(N + SR // 4)
    return irfft(rfft(rounded, m) * (np.fft.rfftfreq(m, 1 / SR) < TOP_HZ), m)[:, :N]


dry = scene()
out = record(dry)
dump_mix(out)
```